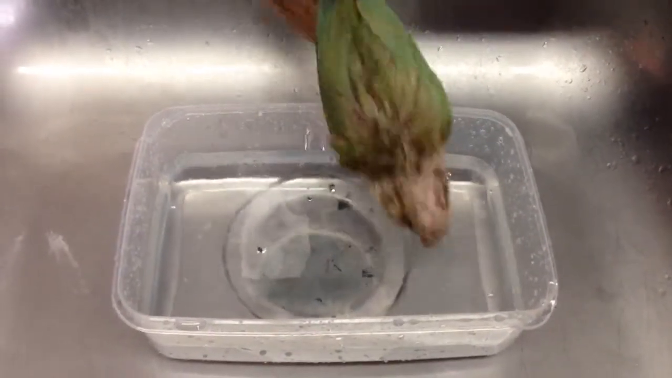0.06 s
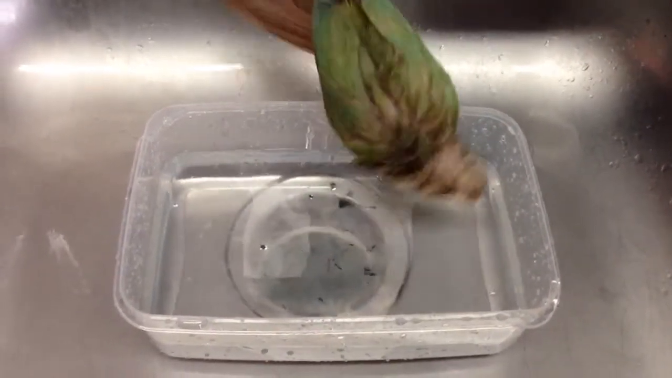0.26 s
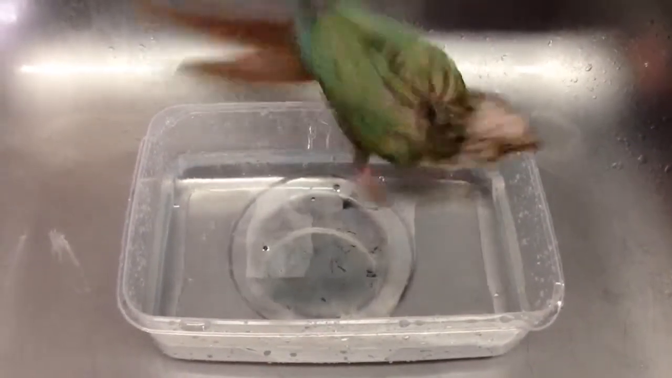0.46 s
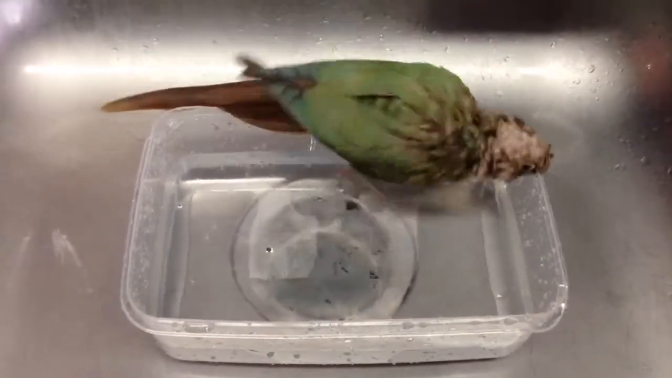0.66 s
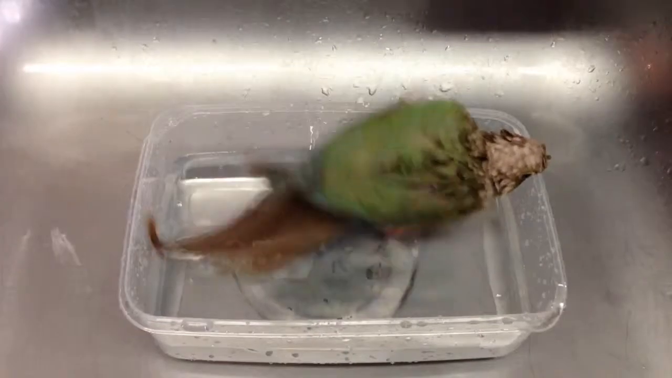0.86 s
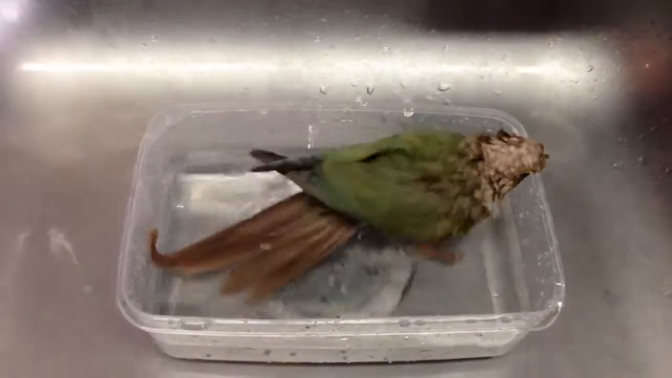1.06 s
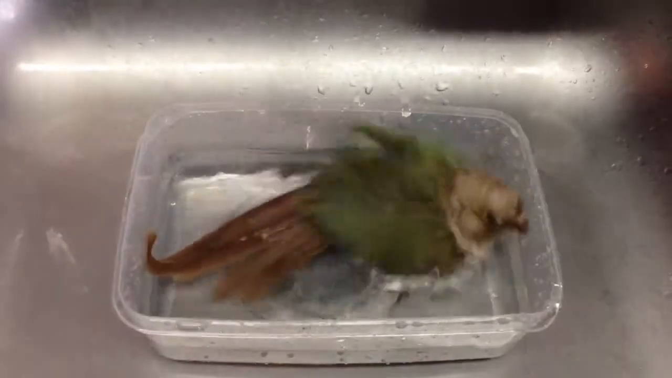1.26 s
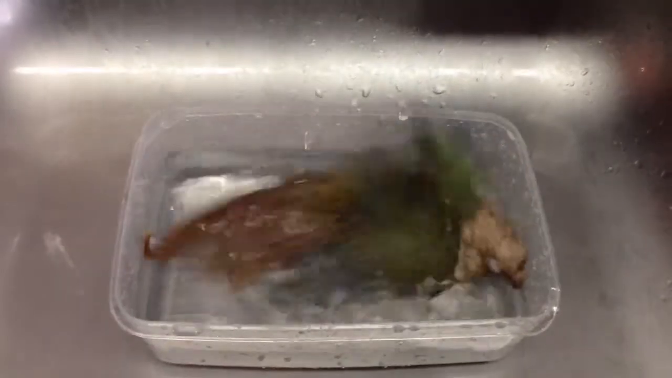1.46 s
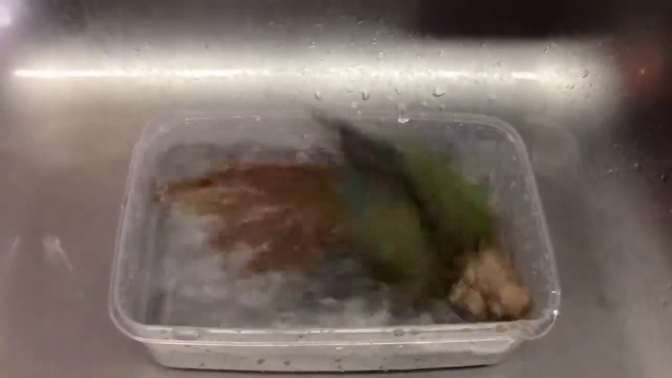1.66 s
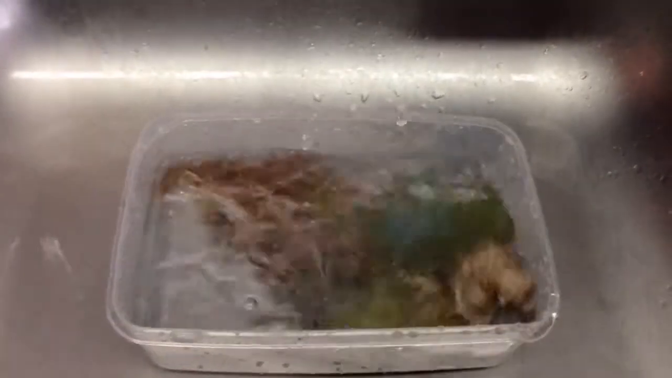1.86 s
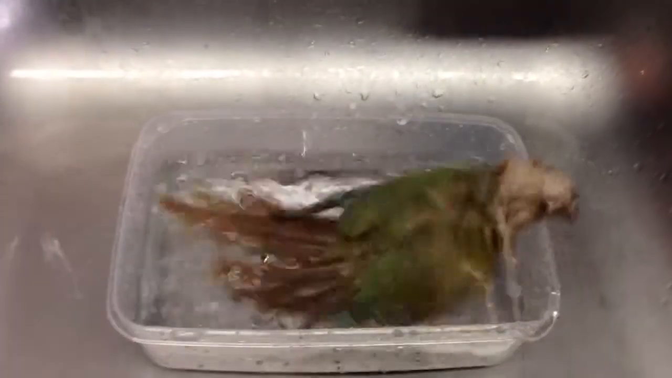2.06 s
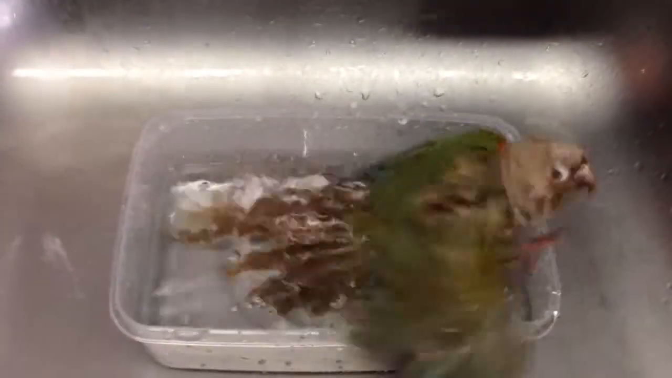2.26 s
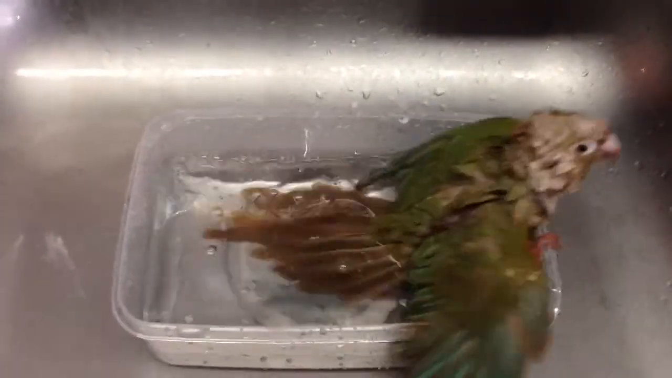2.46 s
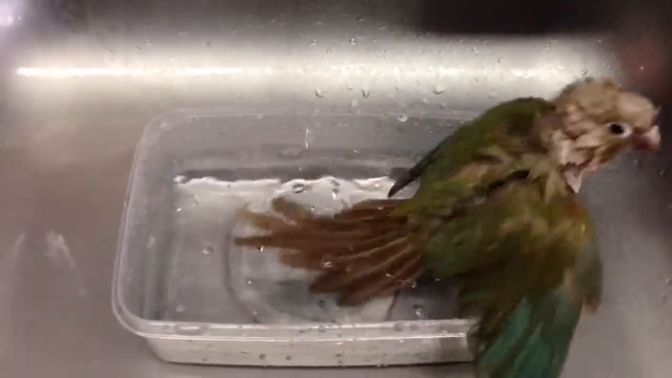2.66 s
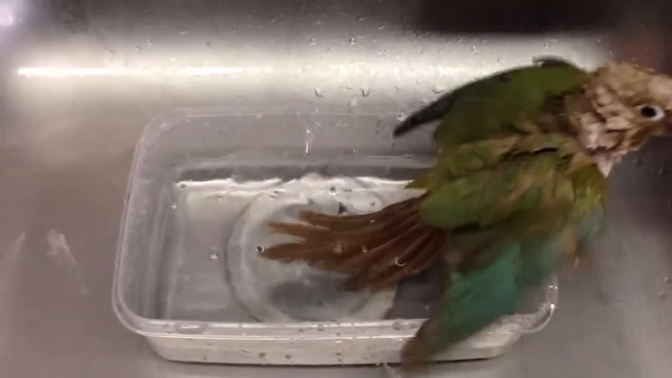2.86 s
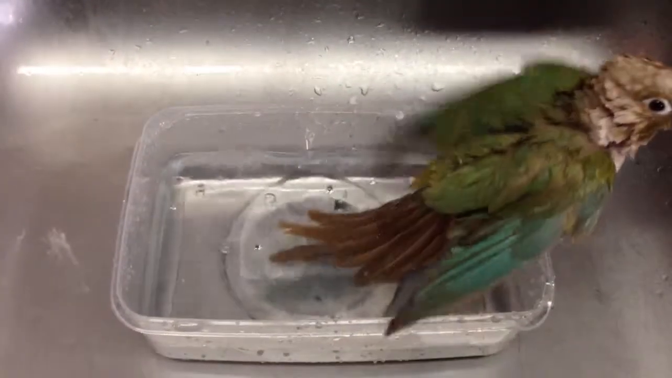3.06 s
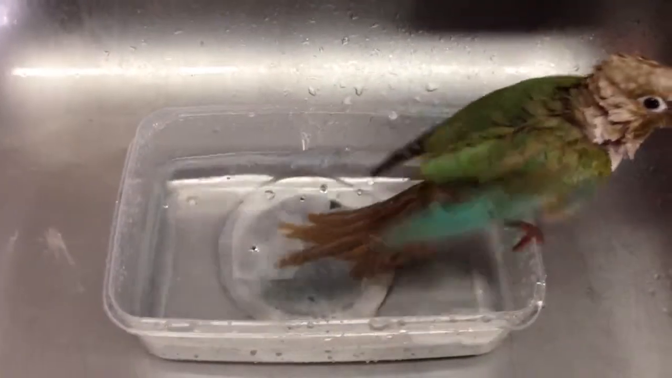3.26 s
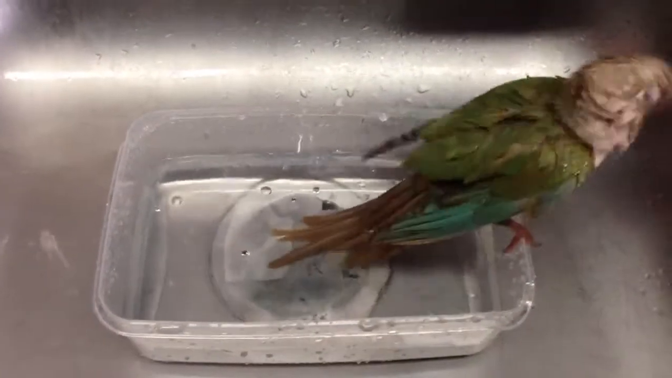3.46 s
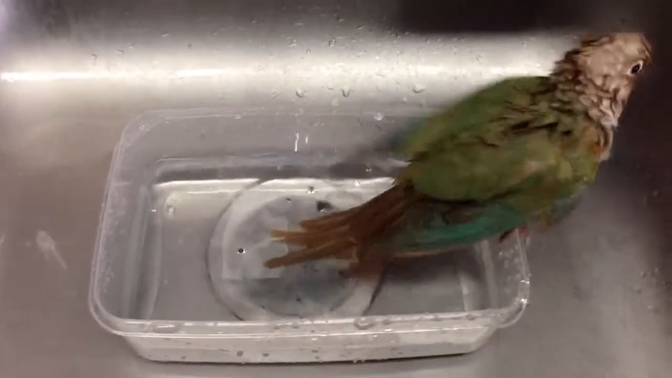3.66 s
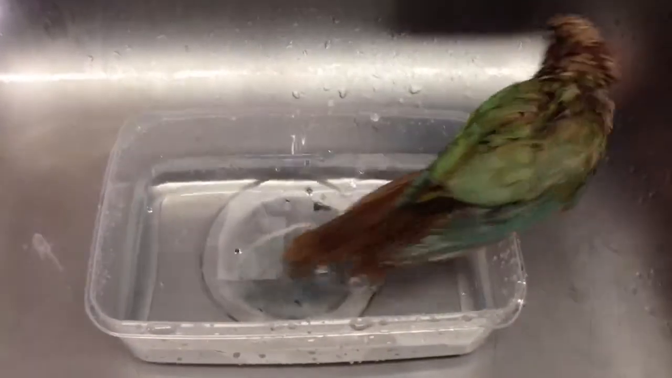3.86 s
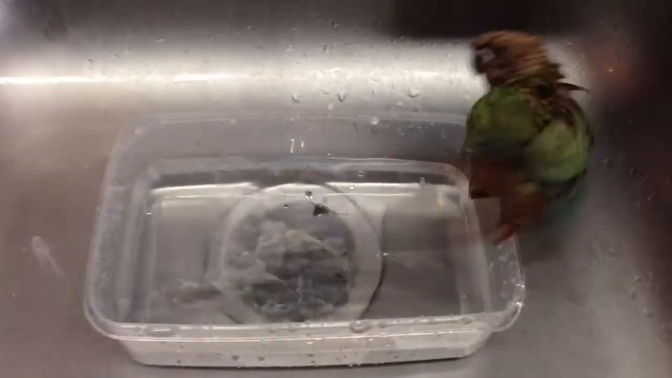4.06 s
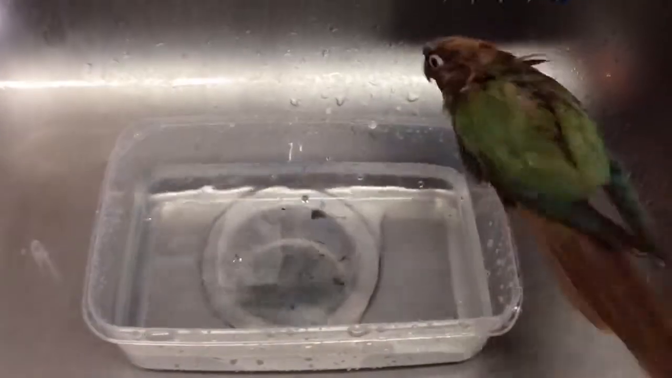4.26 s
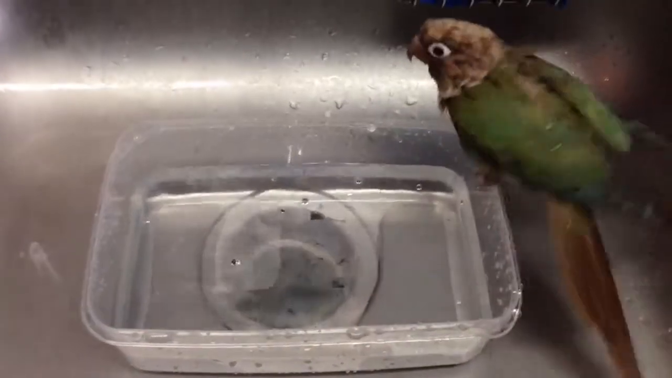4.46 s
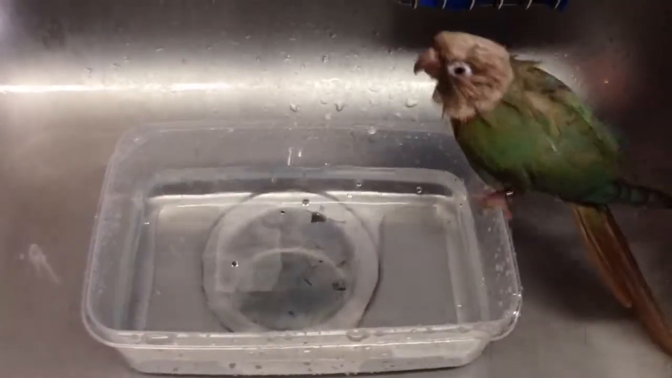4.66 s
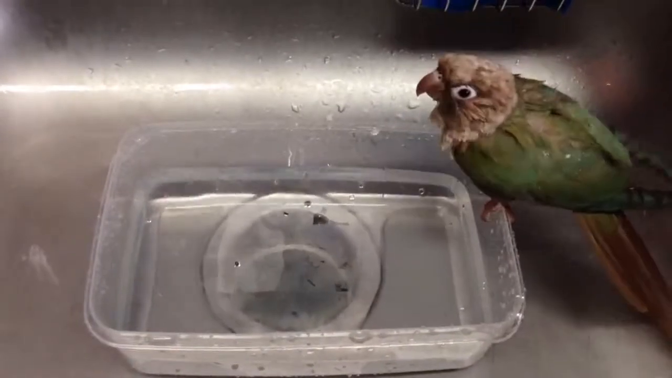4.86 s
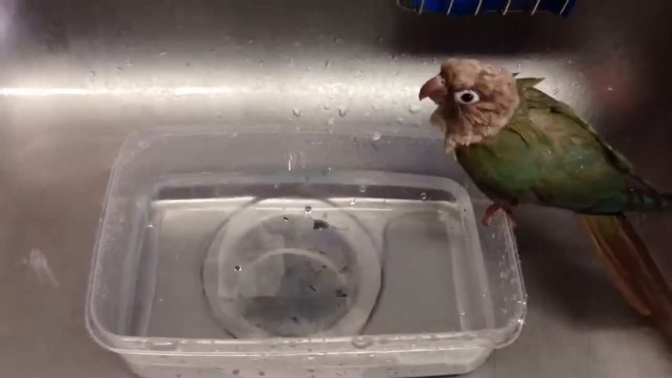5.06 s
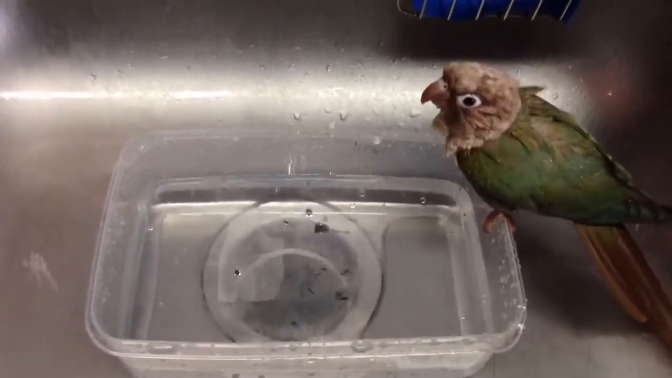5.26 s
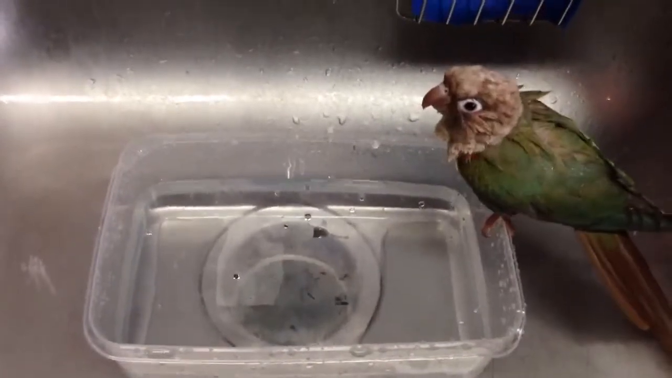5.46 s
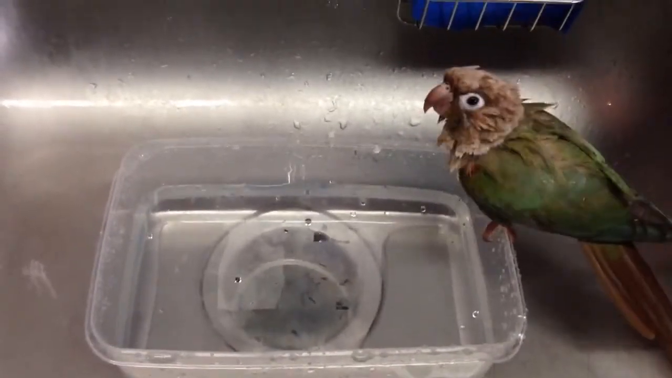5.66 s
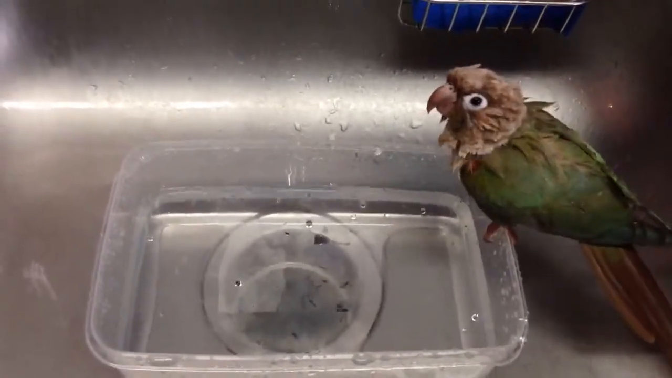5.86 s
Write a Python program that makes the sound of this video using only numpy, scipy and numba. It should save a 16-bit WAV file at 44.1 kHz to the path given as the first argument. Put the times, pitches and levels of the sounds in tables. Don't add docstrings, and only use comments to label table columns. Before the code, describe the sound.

Close above a plastic water tub in a steel sink, a small bird steps in with claw taps, little plops and low metallic thuds. It thrashes for about a second, wings slapping and spraying water, the sink booming at the hardest hit. Then only scattered drips, taps and soft bumps as it climbs out, over faint room hum and hiss.

```python
import sys
import numpy as np
from scipy import signal
from scipy.fft import rfft, irfft
from scipy.io import wavfile
from scipy.ndimage import uniform_filter1d
from numba import njit

SR = 44100
rng = np.random.default_rng(int(sys.argv[2]) if len(sys.argv) > 2 else 0)


def magnitude_from_level(level_db):
    exponent = np.asarray(level_db, float) / 20
    return 10 ** exponent


def unload_audio(sound):
    columns = np.transpose(np.atleast_2d(sound))
    steps = np.round(np.clip(columns, -1, 1) * 32767)
    wavfile.write(sys.argv[1], SR, steps.astype(np.int16))


N = 261072


def unit(x):
    return x / np.sqrt(np.mean(x ** 2))


def head_rms(pieces, samples):
    return np.sqrt(np.mean(pieces[:, :samples] ** 2, axis=1))[:, None]


def band(x, lo_hz, hi_hz):
    return signal.sosfilt(signal.butter(3, [lo_hz, hi_hz], "band", fs=SR, output="sos"), x)


def dull(x):
    return signal.sosfilt(signal.butter(1, 9000, fs=SR, output="sos"), x)


def add(track, start_s, piece):
    i = int(start_s * SR)
    track[..., i:i + piece.shape[-1]] += piece[..., :N - i]


def fade(t, t60_s):
    return np.exp(-np.log(1000) * t / np.clip(t60_s, .002, 1))


def ring(x, modes):
    out = 0
    for hz, db, t60_s in modes:
        pole = np.exp((2j * np.pi * hz - np.log(1000) / t60_s) / SR)
        out = out + magnitude_from_level(db) * signal.lfilter([1], [1, -pole], x).imag
    return out


@njit
def pings(start, hz, t60_s, size, glide, swell_cycles):
    out = np.zeros(N)
    for k in range(len(start)):
        phase, level = 0., size[k]
        decay = np.exp(-np.log(1000.) / (t60_s[k] * SR))
        steps = int(t60_s[k] * SR)
        for i in range(min(steps, N - start[k])):
            phase += 2 * np.pi * hz[k] * (1 + glide * i / steps) / SR
            level *= decay
            swell = np.tanh(phase / (2 * np.pi * swell_cycles))
            out[start[k] + i] += level * swell * np.sin(phase)
    return out


# low_hz, high_hz
BAND_HZ = [(480, 1300), (1300, 3000), (3000, 6500), (6500, 10500), (10500, 15500)]
CRACK_COLOUR_DB = (-0.9, 1.4, 1.67, -1, -7)


def cracks(start_s, level_db, bright_db, hollow_db, t60_s, rise_s, snap_db, head_s):
    t = np.arange(SR // 8) / SR
    snap = magnitude_from_level(snap_db) * fade(t, 0.0027)
    tail = fade(t, (t60_s + 0 * start_s)[:, None])
    shape = (snap + tail) * np.tanh(t / rise_s)
    bursts = dull(shape * rng.standard_normal(shape.shape))
    treble_loss_db_s = 111
    coloured, out = 0, np.zeros(N)
    for k, (lo, hi) in enumerate(BAND_HZ):
        part = band(bursts, lo, hi) * magnitude_from_level(-min(k, 3) * treble_loss_db_s * t)
        place = min(k - 1.5, .5 * k - .2)
        tilt_db = bright_db * place + hollow_db * (place ** 2 - .25)
        gain = magnitude_from_level(level_db + tilt_db + CRACK_COLOUR_DB[k])[:, None] / head_rms(part, int(head_s * SR))
        coloured = coloured + (-1) ** k * gain * part
    for s, piece in zip(start_s, coloured):
        add(out, s, piece)
    return out


# start_s, level_db, brightness_db per band, hollowness_db, tail_t60_s
CLIMB = [(0.1576, -74, -6, 0, 0.03), (0.1707, -70, -6, -1, 0.04), (0.4013, -69, -3.5, 0, 0.07),
         (0.640, -66, 2, 0, 0.03), (0.6975, -64, 2, -3, 0.03), (0.913, -62, 4, -2, 0.03),
         (0.952, -72, 8, 2, 0.015), (0.982, -66, 6, 0, 0.02), (0.988, -66, 6, 0, 0.02),
         (1.0905, -56, 1, -4, 0.04), (0.4605, -74, -6, 2, 0.04), (0.6183, -52, -3.5, 1, 0.03),
         (0.6512, -49, -5, 0, 0.037), (0.753, -67.5, -7, -1.2, 0.03), (0.8227, -73, -4.7, 1, 0.04),
         (0.8355, -77, 3.5, 5.5, 0.059), (0.9031, -55, 2.5, -1, 0.12), (0.9280, -48, 0, 1, 0.022),
         (1.0059, -80, 9, 4, 0.012), (1.0935, -51, -0.3, -4, 0.094), (1.1021, -50, -16.5, -7.7, 0.013),
         (1.1675, -66.5, 4, 2.5, 0.059)]
# start_s, level_db, brightness_db per band, hollowness_db, tail_t60_s
BATH = [(1.315, -65.5, -1, 2, 0.15), (1.3582, -51, -4, -1, 0.052), (1.3673, -45.5, -2.5, -5, 0.029),
        (1.4628, -51.5, -1, 0.5, 0.05), (1.4875, -51, 2.5, -3.5, 0.043), (1.5149, -51, 0.5, -0.5, 0.066),
        (1.539, -61, 16, -5.5, 0.029), (1.79, -68, -13, -7, 0.07), (1.8141, -56, -3, -1, 0.083),
        (1.8224, -51.5, -7, -7, 0.09), (1.8338, -52.5, -2, 7.5, 0.084), (1.8454, -38, 0, -1.5, 0.025),
        (1.85, -50, 9, -8, 0.03), (1.72, -64, -0.5, 0, 0.017), (1.75, -69, -2, 1.5, 0.033),
        (1.6113, -69, 1, -21, 0.016), (1.839, -45, -1, -2.5, 0.06), (1.8708, -54.5, 7.5, 2, 0.087),
        (1.7287, -54.5, -3.5, -7.5, 0.081), (1.876, -40.5, -5, -4.5, 0.088), (1.9614, -46, -1, 0, 0.045),
        (2.01, -46.5, 4, -21, 0.13), (2.0635, -66, -1.5, 3, 0.087), (2.076, -57.5, 8.5, -10.5, 0.017),
        (2.116, -83, 10.5, 1, 0.045), (2.282, -61, 1, 0.5, 0.058), (2.2937, -54.5, 1, -1.5, 0.18),
        (2.34, -48, 1.5, -2.5, 0.014)]
# start_s, level_db, brightness_db per band, hollowness_db
DRIPS = [(2.6418, -62.5, 1, 0.5), (2.666, -74, -5, 0), (2.693, -65, 1, -1), (2.7303, -58, -4, -4),
         (2.897, -84, 10, 3), (4.6112, -56, 5, -1), (4.605, -75, -6, 0), (2.7726, -67, 2, 1),
         (2.7801, -59, -4, -3), (3.061, -73, 1, 1), (3.099, -60, -2, 0), (3.1013, -48, 1, -2.5),
         (3.627, -54, 4, 1), (3.914, -78, 0, -3.7), (4.0707, -73, 3, 2.5), (4.23, -66, 8.5, -2.6),
         (4.3612, -58, 5, -1), (4.3655, -60, 5, -1), (4.42, -77, 5, -1), (4.5639, -63, -6, -2.5),
         (4.574, -61, 0.5, 1), (4.6112, -46.5, 4.5, 0.5), (4.6173, -60, 5, -3), (4.6932, -61.5, 1.5, 3),
         (4.699, -58, -6, -4), (4.7997, -82, -4, 1), (4.8274, -81, -3, -0.5), (4.939, -55.5, 2, -1),
         (4.9689, -76, 2, -1), (5.4532, -68, -1.5, -1), (5.473, -68, 2, 1.5), (5.7709, -68, .5, 0)]


def claws_and_drops():
    snap_db = 9.5
    splashes = np.transpose(np.vstack([CLIMB, BATH]))
    sharp = cracks(*splashes, rise_s=0.00019, snap_db=snap_db, head_s=0.016)
    drips = cracks(*np.transpose(DRIPS), t60_s=.04, rise_s=0.00006, snap_db=snap_db, head_s=0.013)
    return magnitude_from_level(-1.0) * (sharp + drips)


# start_s, level_db, brightness_db per band, hollowness_db
SLAPS = [(0.688, -68.5, -5, 3.2), (0.86, -68.5, 3, 2), (0.875, -67, 3.5, 3), (0.948, -65, 1, -2),
         (0.967, -69, -2, 3.8), (1.174, -64.5, 2.5, 2), (1.341, -61.5, 1.5, 1.5), (1.497, -57, 8, -8),
         (1.521, -53.5, -14, -30), (1.562, -57, 6, -20), (1.586, -50, 11, -15), (1.599, -52, 4.5, -3.5),
         (1.645, -49.5, -1.5, -3.5), (1.682, -52.5, -4, -18), (1.696, -52, 7.5, -5.5), (1.72, -59, -3, -14),
         (1.729, -61, 2, -18), (1.842, -47.5, 1.5, 2), (1.919, -43.5, -10.5, -17), (1.927, -57, -6, -17),
         (1.94, -77, 5, 9), (1.976, -51, -1, 0), (2.051, -56, 10, -19), (2.218, -65, 3.5, 2.5),
         (2.311, -55.5, 3, 0.5), (2.326, -57, 3, -4), (2.358, -62, 1.5, 0), (4.21, -69.5, -2.5, 3)]


def wing_slaps():
    return magnitude_from_level(-1.0) * cracks(*np.transpose(SLAPS), t60_s=0.17, rise_s=0.0014, snap_db=-89, head_s=0.0091)


# pitch_hz, level_db, t60_s
SINK = [
    [(248, 6.5, 0.33), (274.6, 12.5, 0.21)],
    [(341, -4, 0.041), (358.6, -11, 0.72)],
    [(453, -11, 0.048), (620, -22, 0.19), (650, 11.5, 0.0092), (780, -19, 0.15), (970, -13, 0.24),
     (1075, -9, 0.006)],
]
# start_s, low_group_db, middle_group_db above it, high_group_db above it
STEP_IN = [(0.069, -92, 8, 14), (0.157, -97, -1, 12), (0.386, -73.5, -16, 0.5), (0.458, -69, -14, 2.5),
           (0.623, -49, -1.5, -10), (0.636, -52, -27, -8), (0.651, -48.5, -1.5, 2.5), (0.679, -60, -2, -15),
           (0.762, -71.5, 8.5, -3), (0.82, -69, 0, -9), (0.7, -62, -13, -23), (1.115, -72, 0, -6),
           (0.925, -47, -14, -1.5), (0.946, -54.5, -5, 0.5), (0.962, -55, -5.5, -15),
           (1.1, -76.5, 17.5, 24.5), (1.138, -77.5, 6, 9)]
# start_s, low_group_db, middle_group_db above it, high_group_db above it
THRASH = [(1.363, -60.5, -10, -22), (1.46, -56, -18, -14), (1.483, -61, -20, 9.5),
          (1.518, -61.5, -3.5, -12), (1.697, -65.5, -11, -2), (1.847, -36.5, -10, -8.5),
          (1.88, -46, -14, -19), (1.914, -50, -18, -0.5), (1.958, -64.5, -3, 11), (1.992, -46.5, -11, -35),
          (2.03, -68, -2, -19), (2.102, -76, 4, -22), (2.215, -76.5, 3.5, 3.5), (2.308, -62.5, -2.5, -5),
          (2.356, -60, -5.5, -9), (2.259, -67, -15, -12), (2.455, -73, 0.5, -6), (1.59, -64, -8, -2)]
# start_s, low_group_db, middle_group_db above it, high_group_db above it
STEP_OUT = [(2.674, -56.5, -16, -22), (2.72, -66.5, -14, -4.5), (3.136, -71, -13, -4),
            (2.783, -66.5, 1, -3), (3.062, -62, -11, -7), (3.099, -59.5, -27, -11.5),
            (3.619, -60, -11, -12), (4.19, -64, -22, -7), (4.208, -64.5, -22, -0.5), (4.25, -72, -20, -9),
            (4.56, -66, -9, -9), (4.6, -67.5, -1.5, -10), (4.664, -81.5, 7, 10), (4.92, -90.5, 22.5, 18),
            (5.439, -73.5, -19, -12)]
WET_T60_S = (0.5, 0.42, 0.46)


def sink_floor():
    start_s, db, middle_db, high_db = np.transpose(np.vstack([STEP_IN, THRASH, STEP_OUT]))
    t = np.arange(SR // 4) / SR
    push_s, thud_db, jolt_db = 0.0072, -17, -20
    pushes = rng.standard_normal((len(start_s), len(t))) * t * np.exp(-2 * t / push_s)
    damp_s = np.repeat(WET_T60_S, [len(STEP_IN), len(THRASH), len(STEP_OUT)])[:, None]
    booms = 0
    for modes, group_db in zip(SINK, (db, db + middle_db, db + high_db)):
        boom = ring(pushes, modes) * fade(t, damp_s)
        booms = booms + magnitude_from_level(group_db + 7.0)[:, None] / head_rms(boom, SR // 40) * boom
    shoves = magnitude_from_level(db + thud_db)[:, None] / head_rms(band(pushes, 95, 200), SR // 20) * pushes
    floor, counter = np.zeros(N), np.zeros(N)
    for s, boom, shove in zip(start_s, booms, shoves):
        add(floor, s, boom)
        add(counter, s, shove)
    floor = band(band(floor, 227, 3100), 190, 3000)
    thud = band(counter, 95, 200) + magnitude_from_level(jolt_db) * band(counter, 24, 70)
    return floor, thud


# start_s, peak_db, pitch_hz, t60_s
BUBBLES = [(1.3665, -23.5, 2200, 0.0067), (1.4621, -28, 3800, 0.011), (1.5125, -35.5, 2060, 0.011),
           (1.5347, -47, 2670, 0.017), (1.563, -33.5, 5820, 0.0091), (1.571, -45, 2600, 0.013),
           (1.5998, -29.5, 2390, 0.0098), (1.6482, -28.5, 3760, 0.0076), (1.6856, -41, 3140, 0.025),
           (1.6914, -27.5, 1940, 0.0091), (1.6975, -39, 4670, 0.02), (1.7301, -36, 3170, 0.026),
           (1.7361, -31.5, 2070, 0.016), (1.77, -37, 2300, 0.0073), (1.7892, -38, 1800, 0.015),
           (1.8396, -32, 1508, 0.072), (1.9225, -23, 3290, 0.012), (1.93, -23, 3370, 0.011),
           (1.9356, -22, 2180, 0.0069), (1.97, -29.5, 4380, 0.0089), (1.9834, -35.5, 8670, 0.0077),
           (1.991, -29, 2060, 0.012), (2.0527, -35.5, 3660, 0.036), (2.162, -58, 3130, 0.015),
           (2.186, -54.5, 3230, 0.038), (2.2703, -51.5, 1830, 0.1), (2.3126, -47, 4440, 0.072),
           (2.4187, -50.5, 5940, 0.01), (2.4953, -61, 3910, 0.019), (4.07, -44, 5980, 0.0087),
           (1.7195, -40, 2000, 0.0072), (1.7305, -28, 3700, .008), (1.7305, -38.5, 2040, .015),
           (1.8465, -21.5, 4740, .008), (1.849, -36, 5600, 0.006), (1.8455, -21, 2640, 0.0063),
           (1.921, -27, 1090, 0.0081)]
# start_s, peak_db, pitch_hz, t60_s
GULPS_AND_KNOCKS = [(0.46, -58, 606, 0.018), (1.102, -31, 1067, 0.027), (1.104, -34, 1490, 0.012),
                    (1.486, -35.5, 517, 0.042), (2.061, -53, 780, 0.085), (2.668, -47.5, 696, 0.02),
                    (0.652, -28.5, 746, 0.022), (0.929, -36, 990, 0.016), (1.846, -29, 686, 0.017),
                    (1.963, -32, 580, 0.031), (2.2, -49, 750, 0.025), (2.24, -54, 1010, 0.02),
                    (2.342, -46, 1760, 0.039), (2.781, -48, 1510, 0.02), (3.062, -47.5, 776, 0.027),
                    (4.564, -44.5, 760, 0.034)]
# start_s, peak_db, pitch_hz, t60_s
CLINKS = [(0.171, -56, 1800, .012), (0.6185, -45, 9000, 0.0039), (0.753, -59, 2800, 0.011),
          (0.929, -43, 1550, 0.031), (1.094, -44, 4200, 0.013), (1.095, -46, 2600, 0.013),
          (1.4627, -31, 2030, 0.011), (1.655, -40, 4360, .01), (1.7015, -42, 6460, 0.0093),
          (1.71, -38, 1700, 0.011), (1.747, -39, 3520, 0.0042), (1.8222, -36, 4560, 0.0059),
          (1.841, -20.5, 3670, 0.0086), (1.854, -39, 7600, 0.0066), (1.879, -31, 2060, 0.0093),
          (1.926, -30.5, 4070, 0.011), (2.012, -29, 3800, .006), (2.056, -43.5, 2200, 0.024),
          (2.731, -34, 1890, 0.0061), (3.102, -45, 1790, 0.034), (3.627, -40.5, 1840, 0.018),
          (3.627, -44.5, 6300, 0.013), (4.23, -51.5, 6940, 0.0065), (4.361, -43.5, 5750, 0.0081),
          (4.367, -52, 3880, 0.017), (4.611, -31, 10300, 0.0069), (4.7, -49, 1510, .007),
          (4.94, -46, 2420, 0.0093)]


def bubbles_and_clinks():
    start_s, peak_db, hz, t60_s = np.transpose(np.vstack([BUBBLES, GULPS_AND_KNOCKS, CLINKS]))
    start = (start_s * SR).astype(int)
    return pings(start, hz, np.clip(t60_s, .004, .06), magnitude_from_level(peak_db + 6.5), 0.061, 2.0)


# start_s, peak_db, pitch_hz, t60_s
STEEL_RINGS = [(0.655, -49, 977, 0.19), (0.654, -50, 840, .07), (0.66, -51, 1588, 0.19),
               (0.955, -49, 725, 0.075), (0.966, -43, 1560, 0.054), (0.985, -62.5, 948, 0.26),
               (1.106, -48, 955, .17), (1.106, -60, 713, 0.12), (1.107, -50, 1034, .14),
               (1.11, -57, 1146, .25), (1.106, -57, 1450, 0.18), (1.2, -61, 1130, .2),
               (0.872, -51, 1490, 0.063), (1.875, -38, 3630, .12), (1.9, -37, 1050, .05),
               (4.365, -60, 2560, .05), (0.7, -56, 1400, .08), (0.74, -59, 724, .12),
               (0.76, -59, 1000, .08), (0.955, -53, 1980, .1), (0.88, -58, 990, .05),
               (1.455, -47, 3000, .04), (2.0, -44, 601, 0.082), (1.36, -38, 1500, .04),
               (0.93, -40, 550, .05), (2.318, -46, 4450, .05)]


def steel_rings():
    start_s, peak_db, hz, t60_s = np.transpose(STEEL_RINGS)
    start = (start_s * SR).astype(int)
    return pings(start, hz, np.clip(t60_s, .03, .3), magnitude_from_level(peak_db), 0., 3.6)


def surface_waver(tones):
    waver = unit(band(rng.standard_normal(N), 40, 260))
    return band(tones * (1 + .45 * waver), 430, 15000)


# time_s, level_db
SPRAY = [(0.621, -75), (.7, -84.5), (.8, -83), (1.04, -85), (1.16, -84), (1.28, -86.5), (1.37, -79.5),
         (1.45, -71.5), (1.53, -62.5), (1.72, -68.5), (1.82, -75), (1.92, -56), (2.0, -61.5), (2.05, -71),
         (2.14, -80.5), (2.31, -72), (2.4, -79)]
SPRAY_COLOUR_DB = (2.6, 9.5, 12.7, 7.6, 11.6)


def spray():
    drops_per_s, hiss_db, calm_s = 5000, -3, 2.62
    chance = rng.random((int(drops_per_s * N / SR), 4)).T
    hz = 500 * 30 ** chance[1]
    cycles = 7.3 * 7 ** chance[2]
    size = magnitude_from_level(-3.0 * np.log(1.002 - chance[3]))
    drops = pings((chance[0] * N).astype(int), hz, cycles / hz, size, 0.85, 0.33)
    clumps = np.repeat(rng.standard_normal((len(BAND_HZ) + 1, N // 400 + 1)), 400, axis=1)
    clumps = uniform_filter1d(clumps, size=300)[:, :N]
    hiss = rng.standard_normal(N)
    t = np.arange(N) / SR
    time_s, level_db = np.transpose(SPRAY)
    effort_db = np.interp(t, time_s, level_db, -120)
    out = 0
    for k, (lo, hi) in enumerate(BAND_HZ):
        water = unit(band(drops, lo, hi)) + magnitude_from_level(hiss_db) * unit(band(hiss, lo, hi))
        swell_db = effort_db + SPRAY_COLOUR_DB[k] + 2.0 * clumps[k] + 0.37 * clumps[-1]
        out = out + (-1) ** k * magnitude_from_level(swell_db - 3.0) * water
    settle = np.clip((calm_s - t) / .22, 0, 1)
    return dull(out) * settle


# pitch_hz, level_db, t60_s
STEEL = [(248, 20.5, 0.18), (380, 2, 0.16), (605, -9, 0.15), (738, -3.5, 0.068), (962, -9, 0.13),
         (1130, -11, 0.07), (1540, -6, 0.04), (1980, -10, 0.035)]


def sympathetic_steel(water):
    return magnitude_from_level(-41.5) * ring(water, STEEL)


def slosh(steel):
    depth = .3
    load = unit(band(rng.standard_normal(N), 12, 90))
    return steel * (1 + depth * load) / np.hypot(1, depth)


def basin_echo(water):
    t = np.arange(SR // 6) / SR
    walls = rng.standard_normal(len(t)) * fade(t, .085) * (t > .001)
    echo = signal.fftconvolve(water, walls / np.sqrt(np.sum(walls ** 2)))[:N]
    return magnitude_from_level(-7) * band(echo, 380, 22000)


# frequency_hz, density_db per Hz
KITCHEN = [(25, -28), (60, -19), (95, -18), (118, -4), (175, -3), (220, -7), (265, 0), (380, -3), (600, -9),
           (1000, -15), (1600, -17), (4000, -14), (8000, -16), (15500, -16.5)]


def kitchen():
    hz, db = np.transpose(KITCHEN)
    bins = np.maximum(np.arange(N // 2 + 1) * SR / N, 1)
    noise = rfft(rng.standard_normal(N)) * magnitude_from_level(np.interp(np.log(bins), np.log(hz), db))
    bass_share = 1 / (1 + (bins / 600) ** 4)
    rumble, hiss = irfft(noise * bass_share, N), irfft(noise * (1 - bass_share), N)
    waver = uniform_filter1d(np.repeat(rng.standard_normal(N // 5000 + 1), 5000), size=5000)[:N]
    return magnitude_from_level(-67 + .6) * unit(magnitude_from_level(0.1 * waver) * rumble + hiss)


def scene():
    water = claws_and_drops() + wing_slaps() + spray()
    water = water + surface_waver(bubbles_and_clinks() + steel_rings())
    floor, thud = sink_floor()
    steel = slosh(floor + sympathetic_steel(water))
    mic_low_cut = signal.butter(2, 160, "high", fs=SR, output="sos")
    close = signal.sosfilt(mic_low_cut, water + steel)
    return (close + basin_echo(water) + thud + kitchen())[None]


def band_limit(x):
    return signal.sosfilt(signal.butter(12, 16430, fs=SR, output="sos"), x)


def record(dry):
    top_cut = signal.ellip(8, .2, 26, 15400, fs=SR, output="sos")
    mix = signal.sosfilt(top_cut, dry)
    return band_limit(mix)


dry = scene()
out = record(dry)
unload_audio(out)
```